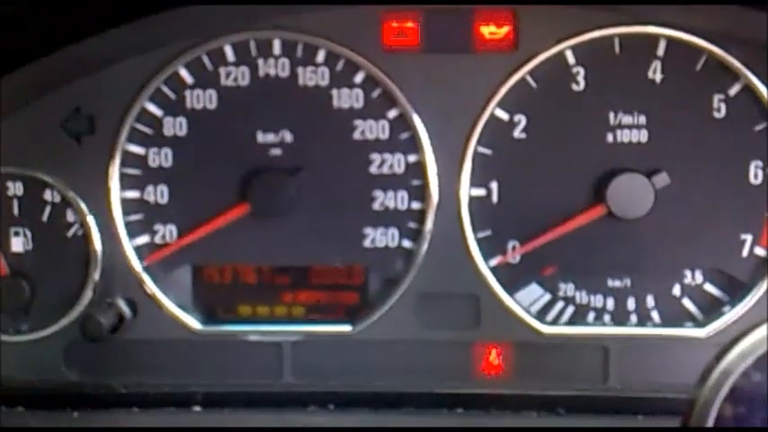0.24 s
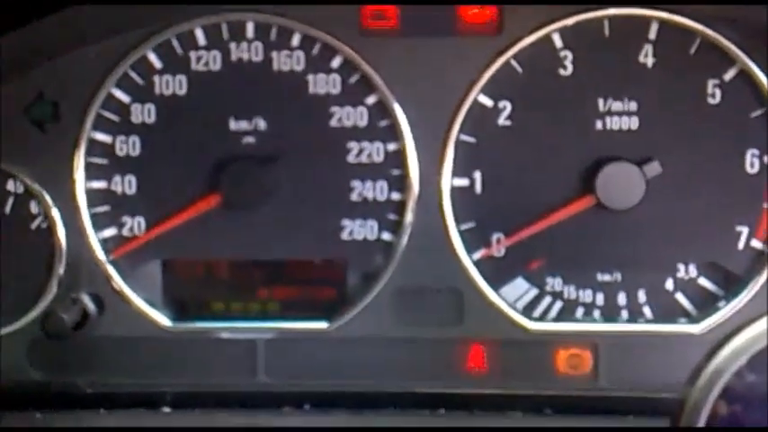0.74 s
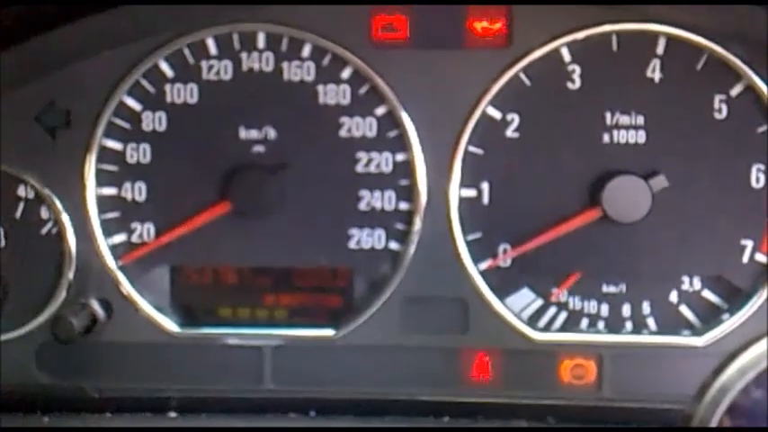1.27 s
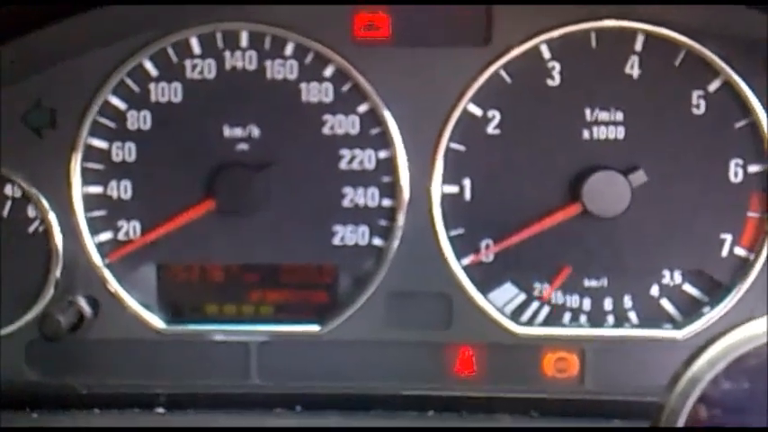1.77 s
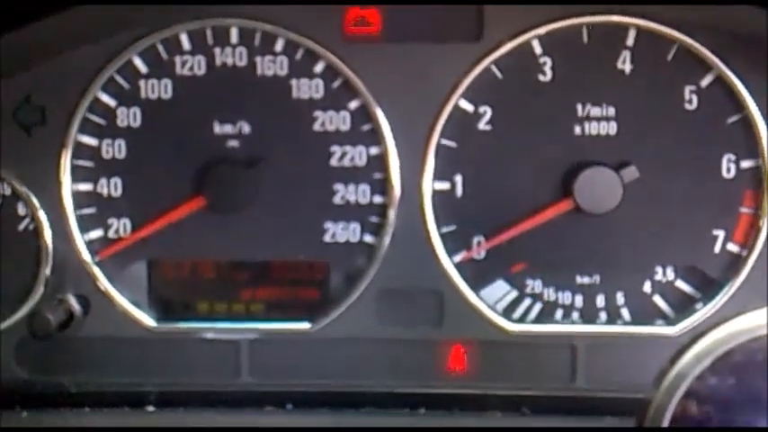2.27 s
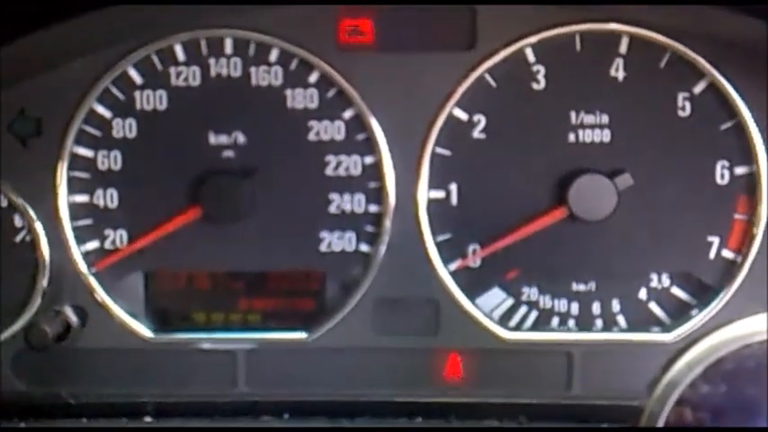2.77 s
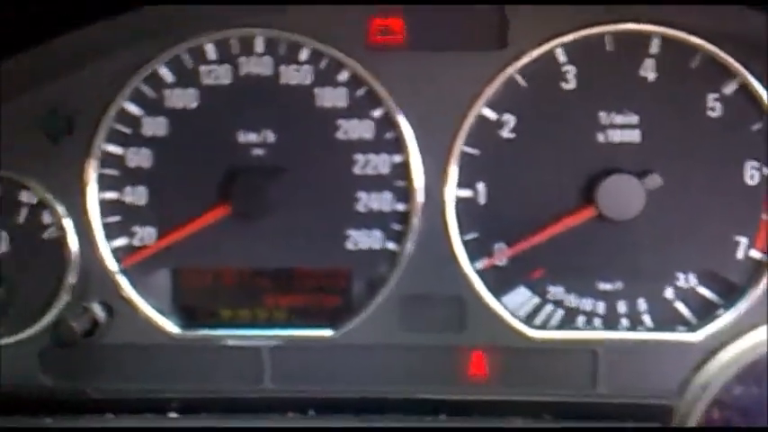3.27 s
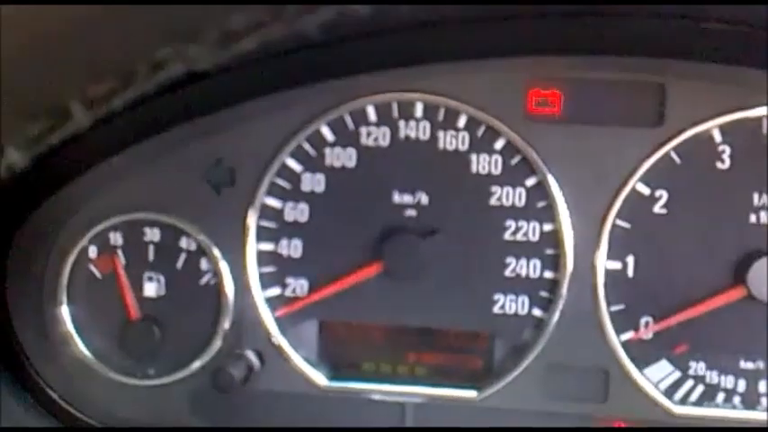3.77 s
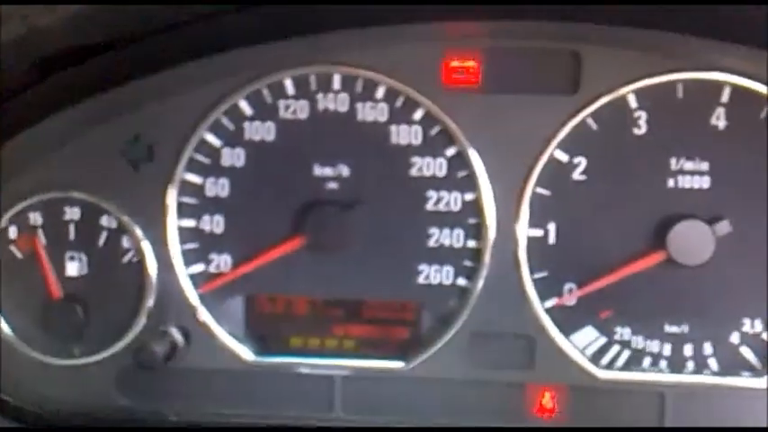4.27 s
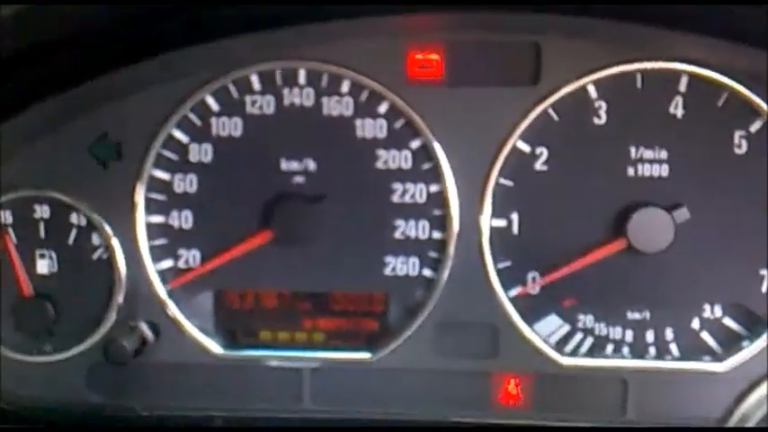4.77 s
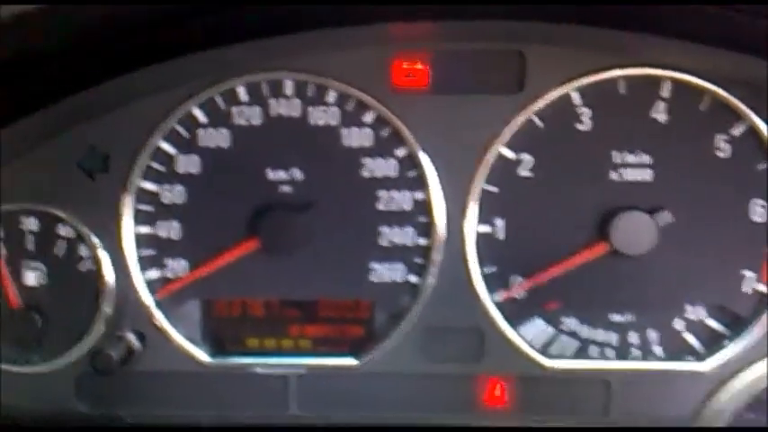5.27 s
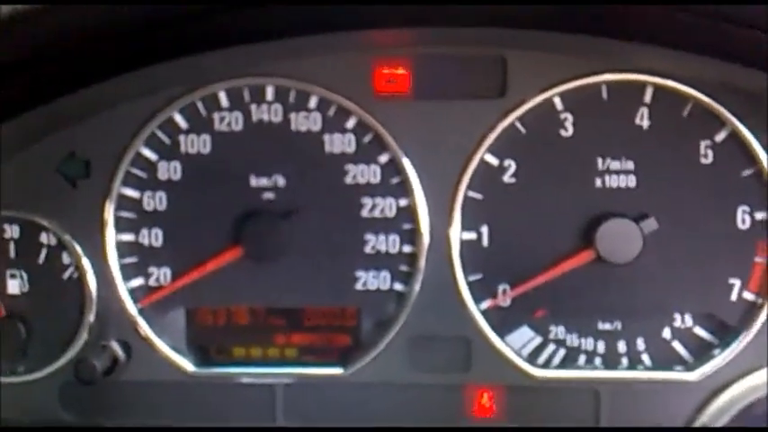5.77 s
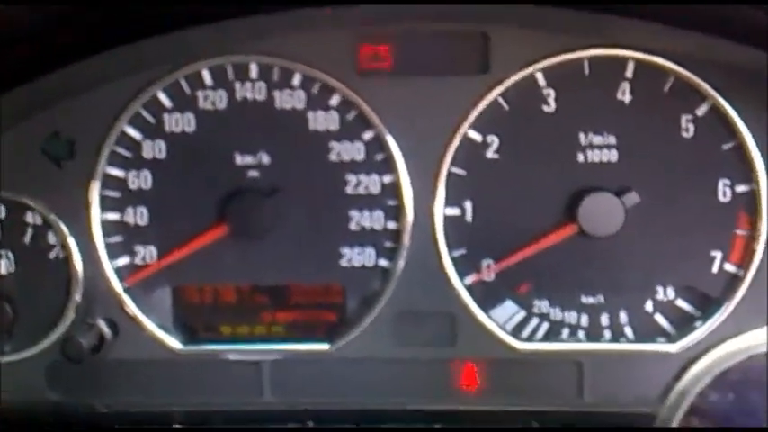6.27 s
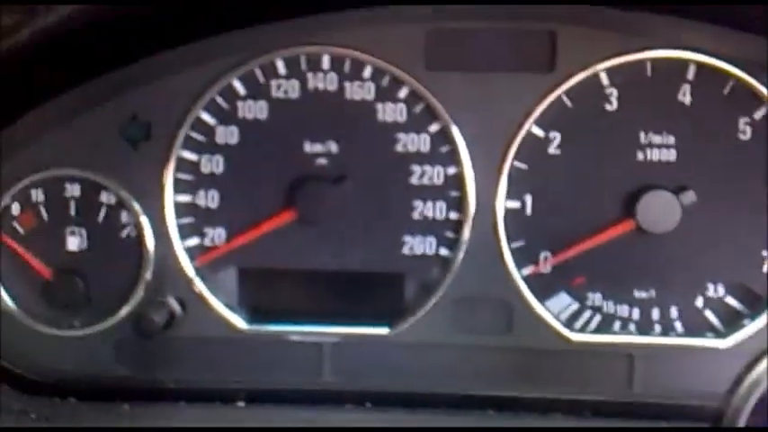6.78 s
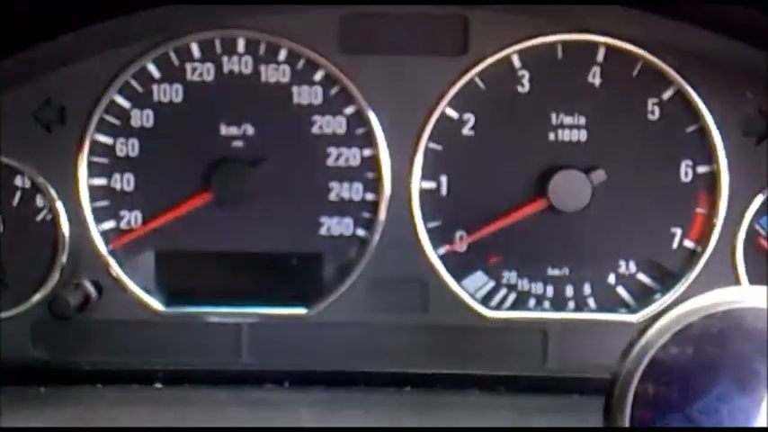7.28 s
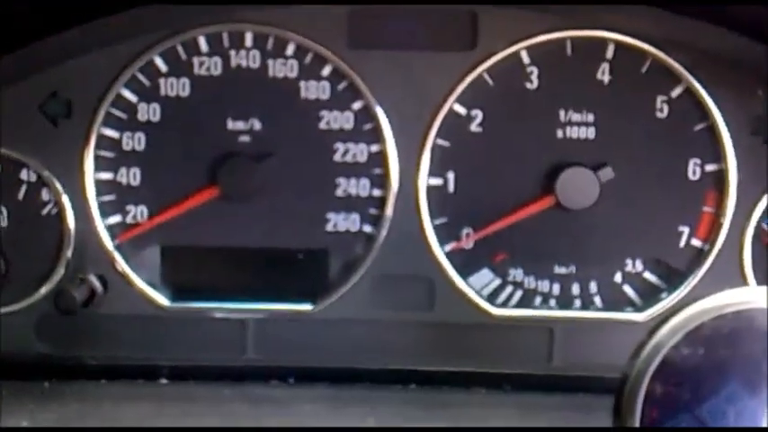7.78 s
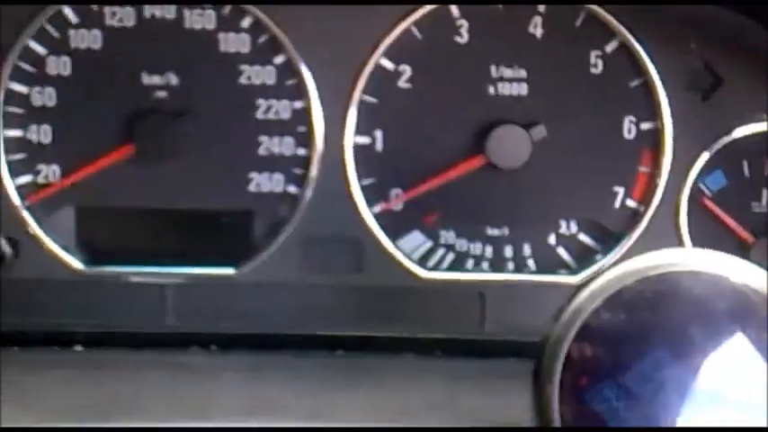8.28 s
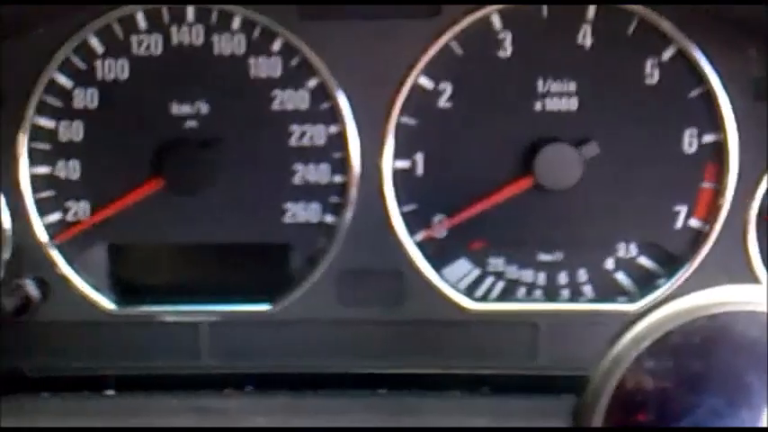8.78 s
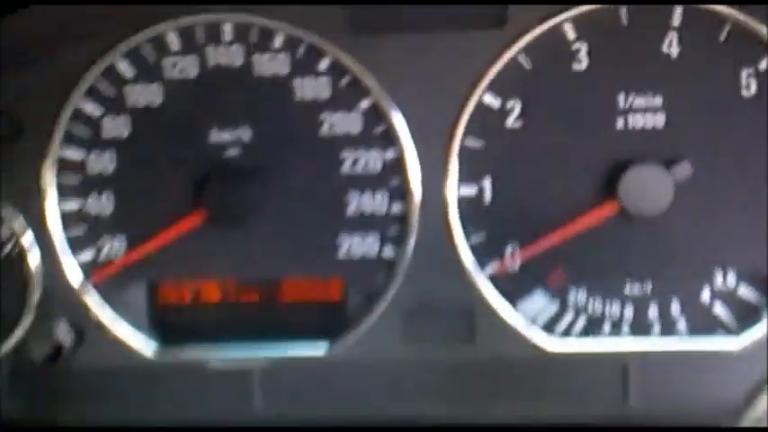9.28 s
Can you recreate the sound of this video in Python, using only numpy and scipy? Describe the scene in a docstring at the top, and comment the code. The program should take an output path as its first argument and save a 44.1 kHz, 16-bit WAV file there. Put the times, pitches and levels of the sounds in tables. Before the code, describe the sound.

Heard from the driver's seat in a closed garage, over soft low room noise and faint hum. Tiny key touches come first; at 0.55 s the lock and a relay click sharply. From 0.6 s the starter engages with a lurch, groaning and almost stalling near 0.95 s, then speeding up. Short runs of deep, dull coughs boom at about 1.1, 1.5 and 1.9 s. Cranking settles into a steady toothy growl and whirr, about nine pulses per second, with low body shudder, never catching. At 4.4 s the lock snaps, the starter releases and a low drone dies away. Light key taps follow around 5.4-5.7 s, dull knocks near 6 s. Loud clacks come at 6.5 s and a strong one at 7 s. Smaller clicks, rustles and knocks follow, with a bright key jingle near 8.65 s, more taps, and lock and relay clicks around 9.2-9.5 s.

```python
"""In a closed garage, from the driver's seat: the starter cranks a six-cylinder car that never catches.
The pinion growls tooth by tooth under each compression; jolts rock the engine and body on their mounts.
A few cylinders cough in short runs of low booms. When the starter is released the crank coasts down.
Then the key is turned off and on: noise bursts ring lock and relays, struck modes jingle the keys.
A soft room noise with faint hum lies underneath, and a diffuse tail follows the mechanical sounds."""
import sys
import numpy as np
from scipy import signal
from scipy.fft import rfft, irfft
from scipy.io import wavfile

SR = 44100
rng = np.random.default_rng(int(sys.argv[2]) if len(sys.argv) > 2 else 0)


def transcribe(signal):
    """Save signal, clipped to [-1, 1], as a 16-bit WAV file at the path in sys.argv[1]."""
    frames = np.atleast_2d(signal).T
    limited = np.clip(frames, -1, 1)
    pcm = np.round(limited * 32767).astype(np.int16)
    wavfile.write(sys.argv[1], SR, pcm)


N = 420273
T = np.arange(N) / SR  # seconds

TOP_HZ = 16000  # upper limit of the microphone
TEETH_PER_STROKE = 35.5  # gear teeth passing per compression
STEADY_PER_S, FIRST_COMPRESSION_S = 9.4, .759  # reference speed [compressions/s], time [s]
# the starter takes hold, is released, and the crank coasts to rest
START_S, RELEASE_S, COAST_T60_S = 0.614, 4.45, 1.6
# the crank labours over one early compression
STALL_S, STALL_WIDTH_S, STALL_DB = .962, .02, -12

# Room noise spectrum: (frequency [Hz], relative level [dB])
ROOM_SPECTRUM = [(12, -39.5), (20, -0.5), (163, -14.5), (204, -11.5), (367, -18.5), (590, -26), (718, -27),
                 (976, -19.5), (1090, -27.5), (1220, -27.5), (16000, -33)]
# Faint electrical hum: (frequency [Hz], mean level [dB])
HUM_TONES = [(200, -72.5), (301, -71.5), (402, -94.5), (501, -83), (602, -83)]

# The hand works the key: (time [s], length [s], finger rustle relative level [dB],
# key jingle relative level [dB])
KEY_GRIPS = [(0.047, 0.034, -65, -80), (0.552, .03, -47.5, -70), (4.48, .1, -60, -69),
             (5.62, 0.096, -54, -54), (5.921, 0.049, -49, -80), (6.525, 0.53, -53.5, -54.5),
             (6.996, .14, -55.5, -86.5), (7.6, 0.11, -64.5, -85), (8.186, 0.077, -51.5, -79),
             (8.47, .02, -69.5, -57.5), (8.648, 0.066, -44.5, -38), (8.934, 0.3, -58.5, -58.5),
             (9.426, .09, -48.5, -65)]
# Modes of the keys: (frequency [Hz], relative level [dB], t60 [s])
KEY_MODES = [(3640, 0.5, 0.032), (4820, -1.5, .04), (5400, -5.5, .04), (6680, -6, .04), (7600, -5, 0.059),
             (10010, -8.5, 0.032), (11360, 1.5, 0.054), (12300, -7, .05)]

# Registers of a click, low to high: (low edge [Hz], high edge [Hz], t60 [s], trim [dB])
CLICK_REGISTERS = [(139.3, 344, 0.099, 1), (560, 1110, .05, -2), (1216.5, 3700, 0.045, -0.5),
                   (4430, 6200, 0.035, -2.5), (6500, 13000, 0.044, -1.5)]
# Modes of lock and steering column: (frequency [Hz], relative level [dB], t60 [s])
COLUMN_MODES = [(820, -6, 0.017), (1001.5, -2.5, 0.027), (1170, -5, 0.049), (1475, 1, .04),
                (2030, 1.5, 0.037), (2189, 3.5, 0.028), (2490, -6.5, 0.058), (3150, -14, 0.059),
                (3645, 3, .035), (4400, -8.5, .04), (4970, 5, 0.039), (5640, -5, 0.019), (5750, -11, .04),
                (8160, -9, 0.042)]
# The lock snaps through its detents: (time [s], relative level [dB], brightness [dB/octave],
# extra level in the lowest register [dB])
LOCK_DETENTS = [(.542, -29.5, 3.5, -5), (4.368, -35.5, -2, 3), (4.382, -35, 2, 3), (4.399, -23, 1.5, -6.5),
                (6.502, -25, -1.5, -4.5), (6.518, -16.5, -.5, 0), (6.543, -15, 1.5, 4.5),
                (6.713, -36.5, 2, 10.5), (6.981, -9, -1.5, -7), (6.989, -27.5, 0.5, 18.5),
                (7.621, -49.5, -1, 3), (8.22, -27.5, -0.5, -3.5), (8.669, -25.5, -.5, -2.5),
                (8.684, -31.5, -2.5, -2.5), (8.751, -32.5, 0, 4), (9.186, -31, 0, -1.5),
                (9.456, -23, 2.5, -4), (9.479, -21, 1.5, -4)]
# Relays and solenoid: (time [s], relative level [dB])
RELAY_CLICKS = [(.55, -17), (0.612, -26.5), (9.499, -25), (9.512, -28.5)]
# A key taps the lock barrel: (time [s], relative level [dB], brightness [dB/octave])
KEY_TAPS = [(.072, -63, -3), (.125, -65, 0), (4.775, -64.5, 2.5), (5.446, -53.5, -2.5), (5.613, -49, 2),
            (5.657, -53.5, -2.5), (5.694, -37, 0.5), (6.604, -44, 1.5), (6.626, -44, 3.5),
            (6.832, -46.5, -1), (8.412, -52.5, -3.5), (8.626, -51.5, 0.5), (8.827, -41, -0.5),
            (8.878, -50, -1.5), (8.93, -39, 1), (9.095, -45, 0), (9.133, -42.5, 1.5)]
# Dull knocks on column and trim, and the starter pinion dropping out of mesh at 4.442 s: (time [s], relative
# level [dB], brightness [dB/octave])
DULL_KNOCKS = [(1.792, -34.5, 1), (4.442, -30, -0.5), (5.332, -52.5, 0.5), (5.932, -34.5, 0.5),
               (5.995, -41.5, 2.5), (6.048, -45.5, 1.5), (6.668, -33, 1), (7.212, -51, -1),
               (7.298, -57.5, -3), (7.362, -56.5, -1), (7.886, -56.5, -1.5), (8.3, -33.5, 0),
               (9.245, -41, 2.5)]
# How strongly a lock detent excites each register, low to high: (level [dB])
DETENT_REGISTERS = [-10.5, -7.5, -1, -6.5, -11.5]
# How strongly a relay excites each register, low to high: (level [dB])
RELAY_REGISTERS = [-25.5, -27, -16, 0.5, -14.5]
# How strongly a key tap excites each register, low to high: (level [dB])
TAP_REGISTERS = [-11, -15, -4.5, -1.5, -7]
# How strongly a dull knock excites each register, low to high: (level [dB])
KNOCK_REGISTERS = [0, -3.5, -7.5, -18.5, -25]
# Dashboard's deep answer to a click: (frequency [Hz], relative level [dB])
DASH_SPECTRUM = [(15, -19), (30, -8), (45, 0), (66, 0), (85, -1.5), (125, -8), (180, -12.5), (300, -33),
                 (800, -69)]
# Relay, solenoid and lock parts that sing: (time [s], frequency [Hz], level of main mode [dB], t60 [s])
PART_RINGS = [(0.5518, 4850, -6.5, 0.024), (0.615, 4800, -34, .03), (4.402, 2410, -15, 0.056),
              (5.448, 5700, -52, 0.066), (5.66, 5650, -47, 0.13), (5.695, 5630, -25, 0.043),
              (6.545, 1140, -16, 0.04), (6.982, 1134, -10.5, .04), (8.223, 3390, -21, 0.03),
              (8.932, 4630, -30, 0.036), (9.482, 1540, -16, 0.05)]

# Cranking speed before the coast-down: (time [s], rate [compressions/s])
CRANK_SPEED = [(.76, 7.25), (.97, 7.89), (1.17, 13.98), (1.35, 12.08), (1.7, 12.69), (2.1, 10.81),
               (2.6, 9.71), (3.3, 9.44), (4.4, 9.34)]
# Six cylinders in firing order, one of them weak: (gear growl [dB], body jolt [dB])
CYLINDER_STRENGTHS = [(1, 2), (0, 0), (-3.5, -5.5), (-.5, 3), (-0.5, 1.5), (-1, 2)]
# Load on the starter at the compressions: (time [s], relative gear growl [dB])
STARTER_LOAD = [(.76, -44.5), (.88, -38), (1.03, -35.5), (1.26, -33.5), (1.8, -38.5), (2.3, -38),
                (3.0, -35), (3.4, -37), (4.4, -35)]
# Gear mesh spectrum in the cabin: (frequency [Hz], relative level [dB])
GEAR_SPECTRUM = [(120, -16.5), (200, 13.5), (280, 4.5), (350, -7), (460, 3.5), (610, -1), (830, -1),
                 (1020, 2.5), (1320, 0.5), (1700, -6.5), (2100, -8.5), (2600, -10), (4500, -24.5),
                 (9000, -45.5)]
# Harmonics of the tooth beat: (multiple of tooth rate, relative level [dB])
TOOTH_HARMONICS = [(1, 9.5), (2, -5.5), (3, -1.5), (4, 6), (5, -5.5), (6, -23), (7, -9)]
# Motor whirr spectrum in the cabin: (frequency [Hz], relative level [dB])
WHIRR_SPECTRUM = [(150, 4), (350, 3), (480, -6.5), (800, -8), (1500, -5.5), (2000, -3), (2400, -8),
                  (2900, -10), (4500, -14.5), (6500, -19.5), (9000, -25.5), (12000, -26), (16000, -26)]
# Engine-bay resonances: (frequency [Hz], relative level [dB], t60 [s])
BAY_MODES = [(277, -6, .08), (395.4, 0, 0.11), (598, 5, 0.048), (764, -8, 0.51), (1036, -3.5, 0.045),
             (1314, -22, 0.057), (1572, 3, 0.15), (1670, -2.5, 0.1), (2323, 1.5, 0.27), (3210, 5.5, 0.023),
             (4690, 3.5, .02)]
# Body shake spectrum in the cabin: (frequency [Hz], relative level [dB])
BODY_SPECTRUM = [(10, -28.5), (20, -21.5), (29, 3), (39, 2), (50, -4), (69, -2.5), (80, -5.5), (96, -13.5),
                 (112, -15), (170, -24.5), (400, -39.5), (900, -84)]

# The engine lurches on its mounts on starting and release: (time [s], level [dB])
ENGINE_LURCHES = [(0.702, -21), (0.985, -25.5), (4.446, -23)]
# Bouts of weak firing: (time [s], first level [dB], time between booms [s], change per boom [dB])
COUGH_BOUTS = [(1.115, -12, .051, -1), (1.521, -10, 0.045, -4.5), (1.926, -11.5, .04, -14)]
# Exhaust and body boom spectrum: (frequency [Hz], relative level [dB])
BOOM_SPECTRUM = [(12, -19.5), (28, 22), (45, 10), (60, 12.5), (76, 5), (110, 4), (160, -3), (215, -31),
                 (300, -38), (450, -40), (800, -61), (2000, -81)]


def undb(db):
    """Decibels to gain."""
    return 10 ** (np.asarray(db) / 20)


def unit(x):
    """Scale to rms 1."""
    return x / np.sqrt(np.mean(x ** 2))


def curve(rows, axis=1):
    """One column of a table, joined by straight lines in time."""
    rows = np.array(rows)
    return np.interp(T, rows[:, 0], rows[:, axis])


def through(x, response):
    """Pass a sound through an impulse response."""
    return signal.fftconvolve(x, response)[:len(x)]


def band(x, lo_hz, hi_hz, order=3):
    """Causal band-pass."""
    edges = [lo_hz, min(hi_hz, .47 * SR)]
    return signal.sosfilt(signal.butter(order, edges, "band", fs=SR, output="sos"), x)


def fade(t, t60):
    """Exponential decay, falling 60 dB in t60 seconds."""
    return np.exp(-np.log(1000) * t / t60)


def gate(start_s, end_s, attack_s, t60):
    """Attack, hold and exponential release."""
    return np.clip((T - start_s) / attack_s, 0, 1) * fade(np.maximum(T - end_s, 0), t60)


def walk(rate):
    """Random values drawn `rate` times a second, joined by straight lines."""
    steps = rng.standard_normal(int(N / SR * rate) + 2)
    return np.interp(T * rate, np.arange(len(steps)), steps)


def colour(points, size=16384):
    """Minimum-phase impulse response with the given (Hz, dB) spectrum."""
    hz, db = np.transpose(points)
    grid = np.maximum(np.fft.rfftfreq(size, 1 / SR), 1)
    level_db = np.interp(np.log(grid), np.log(hz), db)
    cepstrum = irfft(np.log(undb(level_db)))
    # folding the cepstrum forward makes the response causal
    cepstrum[1:size // 2] *= 2
    cepstrum[size // 2 + 1:] = 0
    return irfft(np.exp(rfft(cepstrum)))


def ring(modes, size=12000):
    """Impulse response of decaying (Hz, dB, t60) modes, with unit energy."""
    t = T[:size]
    response = sum(undb(db) * fade(t, t60) * np.cos(2 * np.pi * hz * t) for hz, db, t60 in modes)
    return response / np.linalg.norm(response)


def struck(modes, detune, scatter_db):
    """One contact's ring: random shifts and weights of the modes stand for the place of the touch."""
    touched = [(hz * (1 + detune * rng.standard_normal()), db + scatter_db * rng.standard_normal(), t60)
               for hz, db, t60 in modes]
    return ring(touched, size=3000)


def blows(times, sizes):
    """A train of single pushes."""
    samples = np.clip(np.asarray(times) * SR, 0, N - 1).astype(int)
    return np.bincount(samples, sizes, N)


def add(out, x, s):
    """Mix a short sound in at time s."""
    start = int(s * SR)
    out[start:start + len(x)] += x[:N - start]


def background(room_db=-62.5, tone_db=-68, tone_hz=499):
    """Shaped room noise and wavering hum tones."""
    hum = 0
    for hz, db in HUM_TONES:
        level = undb(db + 1.5 * walk(0.79)) * np.sqrt(2)  # rms to peak
        hum = hum + level * np.sin(2 * np.pi * hz * T + .4 * walk(4.8))
    # a thin tone joins the hum for a while
    present = np.interp(T, [5.25, 5.4, 7.35, 7.5], [0, 1, 1, 0])
    tone = np.sin(2 * np.pi * tone_hz * T + 1.8 * walk(70))
    thin_tone = present * undb(tone_db + 4 * walk(16)) * tone
    room = unit(through(rng.standard_normal(N), colour(ROOM_SPECTRUM)))
    return hum + thin_tone + room * undb(room_db + 1.2 * walk(0.87))


def key_ring(count=600, keys_db=-4, attack_s=.04, settle_t60=0.22):
    """Dangling keys touch at random and ring; the hand's movement opens the level, then they settle."""
    touches = np.zeros(N)
    for s in rng.uniform(0, T[-1], count):
        add(touches, struck(KEY_MODES, detune=.03, scatter_db=5), s)
    swing = sum(undb(db) * gate(s, s + length, attack_s, settle_t60) for s, length, _, db in KEY_GRIPS)
    return unit(touches) * swing * undb(keys_db)


def fingers(grain_db=4, rustle_db=-1, attack_s=0.024, release_t60=.7):
    """Skin and key slide on plastic in small slips: noise of uneven grain, coloured by the plastic."""
    slips = rng.standard_normal(N) * undb(grain_db * walk(400) + 2 * walk(44))
    plastic = colour([(60, -12), (250, 6.5), (550, -8), (900, -1), (2200, -3.0), (4000, -11),
                      (8000, -15), (16000, -18.5)])
    pressure = sum(undb(db) * gate(s, s + length, attack_s, release_t60)
                   for s, length, db, _ in KEY_GRIPS)
    return unit(through(slips, plastic)) * pressure * undb(rustle_db)


def contacts_heard():
    """Every click as (s, dB in each register), from its kind, strength and brightness."""
    centres_hz = [np.sqrt(lo_hz * hi_hz) for lo_hz, hi_hz, *_ in CLICK_REGISTERS]
    octaves = np.log2(np.array(centres_hz) / 2000)  # brightness pivots on 2 kHz
    lowest = np.arange(len(CLICK_REGISTERS)) == 0
    events = [(s, db + np.array(DETENT_REGISTERS) + tilt * octaves + thud_db * lowest)
              for s, db, tilt, thud_db in LOCK_DETENTS]
    events += [(s, db + np.array(RELAY_REGISTERS)) for s, db in RELAY_CLICKS]
    for rows, shape in [(KEY_TAPS, TAP_REGISTERS), (DULL_KNOCKS, KNOCK_REGISTERS)]:
        events += [(s, db + np.array(shape) + tilt * octaves) for s, db, tilt in rows]
    return events


def clicks(rise_s=0.003, contact_s=0.0046, ring_db=-7, grit_db=3, mode_scatter_db=4, detune=0.02,
           size=9000):
    """Parts snap or knock: a few milliseconds of chatter ring the column, each contact in its own way."""
    out, t = np.zeros(N), T[:size]
    for s, levels in contacts_heard():
        grit = np.repeat(rng.standard_normal(size), 20)[:size]  # each value holds for 20 samples
        chatter = rng.standard_normal(size) * undb(grit_db * grit)
        column = struck(COLUMN_MODES, detune, mode_scatter_db)
        for db, (lo_hz, hi_hz, t60, trim_db) in zip(levels, CLICK_REGISTERS):
            envelope = np.minimum(t / rise_s, 1) * fade(np.maximum(t - contact_s, 0), t60)
            burst = chatter * envelope
            part = band(burst + undb(ring_db) * through(burst, column), lo_hz, hi_hz)
            # level is set on the first 12.5 ms
            add(out, part * undb(db + trim_db) / np.std(part[:SR // 80]), s)
    return out


def dashboard(thud_db=-5, thud_t60=0.39, swell_s=0.025):
    """Clicks shake the dashboard into a brief low boom, as strong as their lowest register."""
    times, low_db = np.transpose([(s, levels[0]) for s, levels in contacts_heard()])
    t = T[:SR]
    swell = np.minimum(t / swell_s, 1) * fade(t, thud_t60)
    # overlapping booms add as energy
    energy = through(blows(times, undb(low_db + thud_db) ** 2), swell ** 2)
    return unit(through(rng.standard_normal(N), colour(DASH_SPECTRUM))) * np.sqrt(np.abs(energy))


def springs(pair_split=0.055, pair_db=-5):
    """Small steel parts ring with a close pair of decaying modes."""
    out, t = np.zeros(N), T[:SR // 5]
    for s, hz, db, t60 in PART_RINGS:
        main = np.sin(2 * np.pi * hz * t)
        partner = undb(pair_db) * np.sin(2 * np.pi * hz * (1 + pair_split) * t)
        add(out, undb(db) * fade(t, t60) * (main + partner), s)
    return out


def crank_speed():
    """Compressions per second; the crank coasts down once the starter lets go."""
    return curve(CRANK_SPEED) * fade(np.maximum(T - RELEASE_S, 0), COAST_T60_S)


def crank_angle():
    """Crank position counted in strokes; whole numbers fall on the compressions."""
    angle = np.cumsum(crank_speed()) / SR
    return angle - np.interp(FIRST_COMPRESSION_S, T, angle)


def cylinder(angle):
    """The strengths of the cylinder whose stroke is under way."""
    return np.array(CYLINDER_STRENGTHS)[np.floor(angle).astype(int) % len(CYLINDER_STRENGTHS)]


def drive(attack_s, stall_share, run_on_s, stop_t60, tail_db, tail_t60):
    """Level of the turning starter: sags at the stall, runs on a moment, drops, then dies away slowly."""
    stall = undb(stall_share * STALL_DB * np.exp(-((T - STALL_S) / STALL_WIDTH_S) ** 2))
    end_s = RELEASE_S + run_on_s
    running = gate(START_S, end_s, attack_s, stop_t60)
    tail = undb(tail_db) * gate(START_S, end_s, attack_s, tail_t60)
    return stall * np.maximum(running, tail)


def firing(lead_s, hold_s, t60):
    """Rises to 1 around the start of a bout of coughs, then decays."""
    return np.max([gate(s - lead_s, s + hold_s, 0.0088, t60) for s, *_ in COUGH_BOUTS], axis=0)


def starter(angle, bite=0.27, swing=.06, unloaded_db=-19, tooth_scatter_db=4, rasp_db=-5, clean_db=-6,
            bay_db=-3, relief_db=-10, whirr_db=-43.0, whirr_db_per_octave=9, inrush_db=7, inrush_t60=1.0,
            overrun_db=2, strain_db=-43, strain_end_s=1.01, strain_t60=0.31):
    """Pinion meshes with ring gear: tooth knocks, rasp and whine swell at each compression over a whirr."""
    engaged = drive(attack_s=0.036, stall_share=0.53, run_on_s=0.034, stop_t60=0.31,
                    tail_db=-13, tail_t60=1.62)
    fired = firing(lead_s=0.038, hold_s=0.087, t60=.08)
    # the teeth take up slack abruptly before a compression and ease off after it
    since = (angle + bite) % 1  # strokes
    squeeze = np.interp(since, [0, .1, .38, .72, 1], [0, 0.68, 0.76, 0.062, 0])
    squeeze = squeeze * gate(START_S, RELEASE_S, 0.027, 0.041)
    # a cough takes the load off the teeth
    strength = undb(cylinder(angle + bite)[:, 0] + relief_db * fired)
    load = undb(unloaded_db) + (1 - undb(unloaded_db)) * squeeze * strength

    # the tooth rate dips and recovers once per stroke, with a little random jitter
    uneven_angle = angle + swing * np.cos(2 * np.pi * angle) / (2 * np.pi)
    teeth = TEETH_PER_STROKE * uneven_angle + 0.058 * walk(150)
    contacts = np.flatnonzero(np.diff(np.floor(teeth)) > 0)
    knocks = blows(contacts / SR, undb(tooth_scatter_db * rng.standard_normal(len(contacts))))
    knocks /= np.std(knocks[SR:4 * SR])
    # block and bulkhead spread each knock: delay grows with frequency, 3 ms at 2500 Hz
    spread = np.exp(-1j * np.pi * .003 * np.fft.rfftfreq(N, 1 / SR) ** 2 / 2500)
    knocks = irfft(rfft(knocks) * spread, N)
    # tooth flanks scrape once per contact
    rasp = rng.standard_normal(N) * (1 + .5 * np.cos(2 * np.pi * teeth))
    mesh = undb(rasp_db) * rasp + knocks
    bay = undb(bay_db) * through(mesh, ring(BAY_MODES)) / 3
    mesh = unit(through(mesh + bay, colour(GEAR_SPECTRUM)))
    whine = unit(sum(np.sin(2 * np.pi * k * teeth) * undb(db + 3.5 * walk(14))
                     for k, db in TOOTH_HARMONICS))
    growl = (mesh + undb(clean_db) * whine) * load * undb(curve(STARTER_LOAD))

    # brushes, belts and valve gear grow with speed, with a surge as the motor is switched on
    brushes = rng.standard_normal(N) * undb(0.794 * walk(210))
    brushes = unit(through(brushes + 0.18 * through(brushes, ring(BAY_MODES)), colour(WHIRR_SPECTRUM)))
    effort_db = whirr_db_per_octave * np.log2(curve(CRANK_SPEED) / STEADY_PER_S)
    effort_db = effort_db + inrush_db * fade(np.maximum(T - START_S, 0), inrush_t60)
    whirr = brushes * undb(whirr_db + effort_db + overrun_db * fired)

    # the motor groans while it drags the engine up to speed
    strain = gate(START_S, strain_end_s, 0.095, strain_t60) * undb(strain_db)
    groan = strain * sum(np.sin(2 * np.pi * k * teeth) * undb(2.5 * walk(25)) / k ** 1.6
                         for k in range(1, 7))
    return engaged * (growl + groan + whirr)


def shake(angle, lead=.27, rebound_db=-4, rebound=.7, rumble_db=-4, shake_db=-28, rocking_db=6,
          boom_hz=69, boom_db=-40, boom_t60=1.7):
    """Two jolts per stroke push the engine on its mounts and drive the body's low resonances."""
    jolts = 0
    for offset, db in [(lead, 0), (lead - rebound, rebound_db)]:  # strokes
        at = np.flatnonzero(np.diff(np.floor(angle + offset)) > 0) + 1
        jolt_db = db + cylinder(angle[at] + .5)[:, 1] + 2.3 * rng.standard_normal(len(at))
        jolts = jolts - blows(T[at], undb(jolt_db))
    drone = through(jolts, colour(BODY_SPECTRUM))
    drone /= np.std(drone[SR:4 * SR])
    rumble = unit(through(rng.standard_normal(N), colour(BODY_SPECTRUM)))
    moving = drive(attack_s=0.11, stall_share=0.87, run_on_s=.01, stop_t60=0.64,
                   tail_db=-8.5, tail_t60=1.8)
    # coughs rock the engine harder
    rocking = undb(shake_db + rocking_db * firing(lead_s=0.042, hold_s=0.086, t60=1.1))
    # the cabin drones on after the starter is released
    cabin_level = undb(boom_db) * gate(RELEASE_S, RELEASE_S, .03, boom_t60)
    cabin = cabin_level * np.sin(2 * np.pi * boom_hz * T + 0.59 * walk(12))
    return (drone + undb(rumble_db) * rumble) * moving * rocking + cabin


def coughs_and_lurches(puff_db=-14, puff_t60=0.19, count=4):
    """Firing cylinders and engine lurches push on exhaust and body: each push booms and puffs low noise."""
    booms = [(s + k * gap_s, db + k * step_db)
             for s, db, gap_s, step_db in COUGH_BOUTS for k in range(count)]
    times, db = np.transpose(booms + ENGINE_LURCHES)
    pushes = blows(times, undb(db))
    boom = colour(BOOM_SPECTRUM)
    gas = unit(band(rng.standard_normal(N), 104.0, 212, order=2))
    puff = gas * through(pushes, fade(T[:SR // 2], puff_t60))
    return -through(pushes, boom / np.max(np.abs(boom))) + undb(puff_db) * puff


def garage(x, low_db=-15, low_t60=0.34, mid_db=-30, mid_t60=0.4, high_db=-31, high_t60=0.21):
    """Diffuse tail of cabin and garage as decaying noise: strongest in the lows, shortest in the treble."""
    t, response = T[:SR], 0
    bands = [(50, 580, low_db, low_t60), (520, 6100, mid_db, mid_t60), (4080, 20000, high_db, high_t60)]
    for lo_hz, hi_hz, db, t60 in bands:
        tail = rng.standard_normal(SR) * fade(t, t60) * np.minimum(t / .012, 1)
        response = response + undb(db) * band(tail / np.linalg.norm(tail), lo_hz, hi_hz)
    return through(x, response)


def scene():
    """Driver's seat: engine ahead of the bulkhead, key and lock close by, garage around."""
    angle = crank_angle()
    direct = key_ring() + fingers() + clicks() + springs() + starter(angle)
    low = dashboard() + shake(angle) + coughs_and_lurches()
    return (background() + direct + garage(direct) + low)[None]


def record(dry):
    """The microphone clips anything past full scale and cuts the top of the spectrum."""
    clipped = np.clip(dry, -1, 1)
    return signal.sosfilt(signal.ellip(10, .2, 70, TOP_HZ, fs=SR, output="sos"), clipped)


dry = scene()
out = record(dry)
transcribe(out)
```